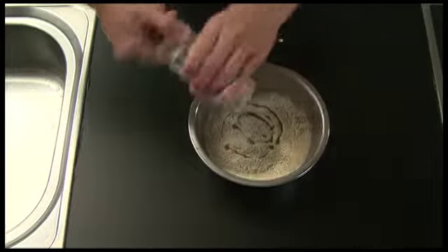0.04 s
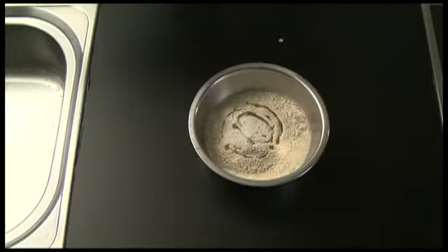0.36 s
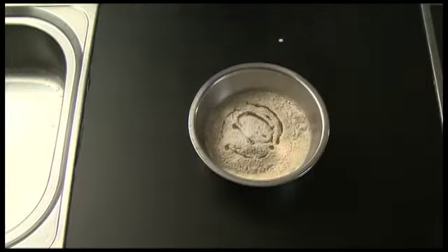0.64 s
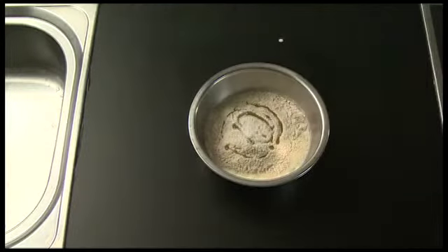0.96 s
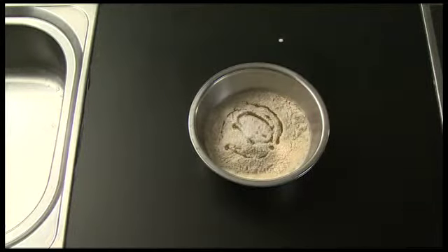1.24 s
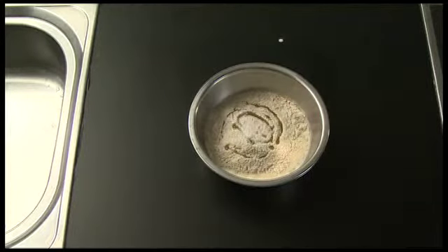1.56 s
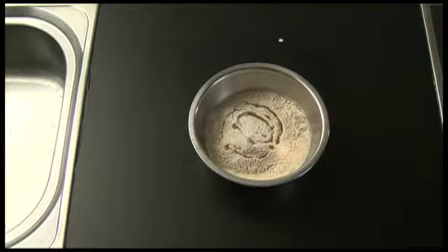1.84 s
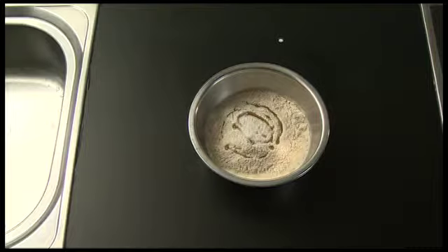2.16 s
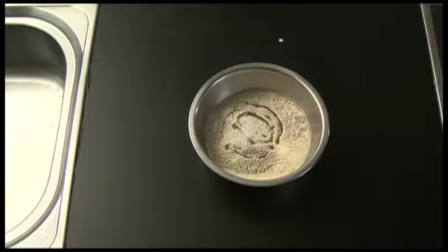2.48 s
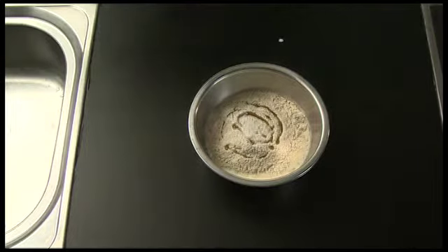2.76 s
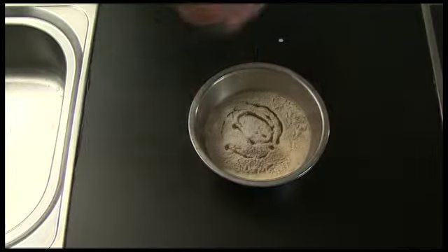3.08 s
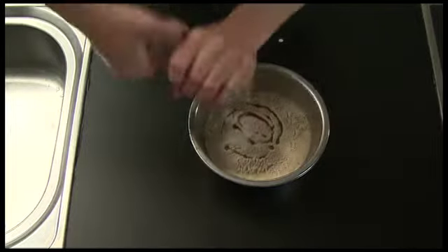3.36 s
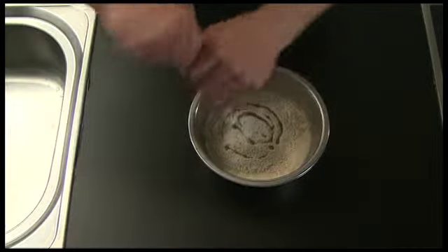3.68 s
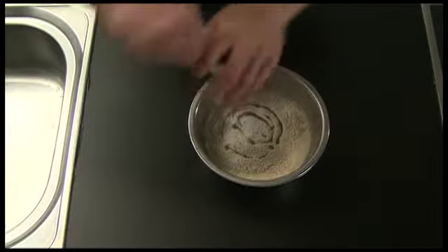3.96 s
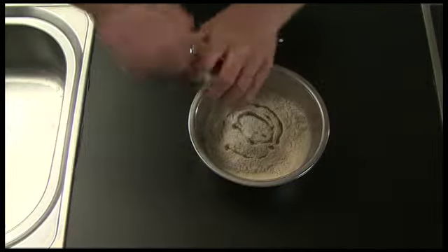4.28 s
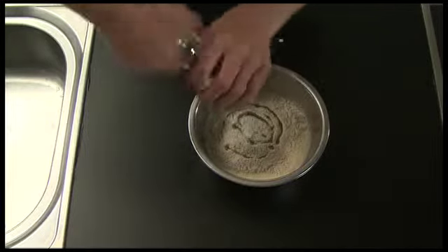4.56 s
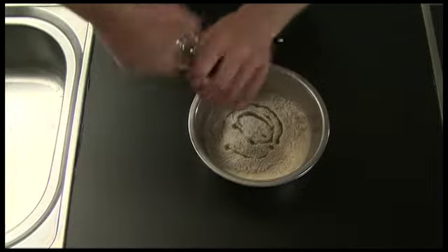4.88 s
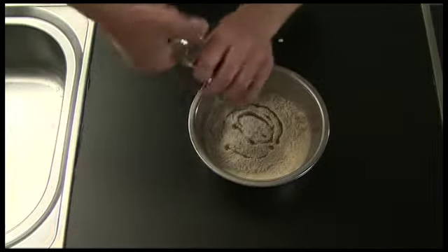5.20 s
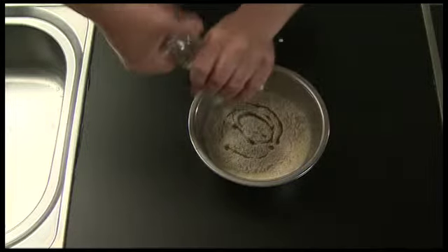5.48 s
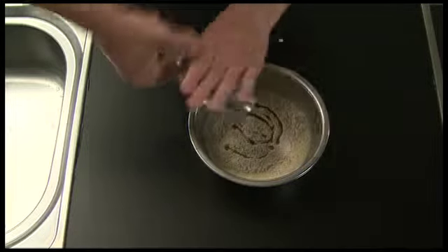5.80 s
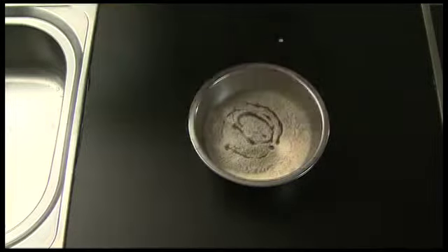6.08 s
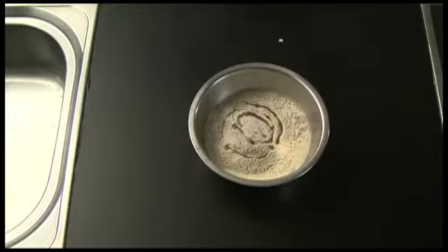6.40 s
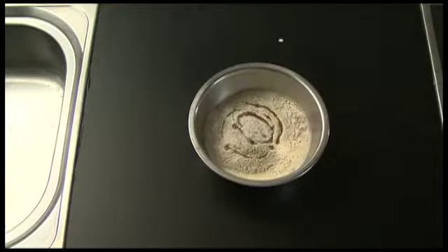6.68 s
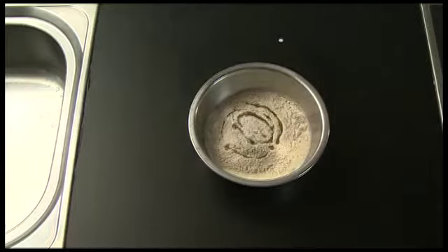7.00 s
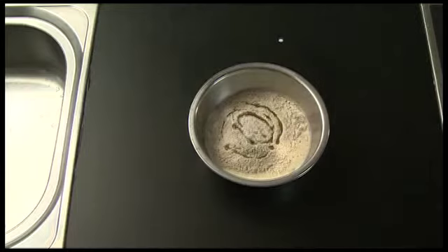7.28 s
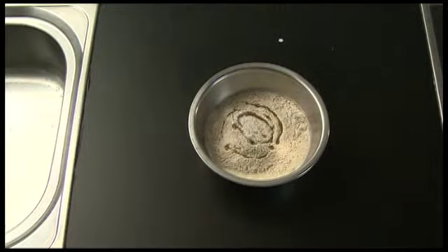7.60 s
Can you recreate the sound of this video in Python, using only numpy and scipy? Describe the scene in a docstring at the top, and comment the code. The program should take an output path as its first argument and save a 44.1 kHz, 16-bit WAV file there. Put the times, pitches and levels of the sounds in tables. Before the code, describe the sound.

A plastic cap clicks onto a glass jar right at the start, followed by faint finger rubbing and taps. At about 1.5 seconds a container lands further off with a loud knock and rocks flat, making the worktop ring briefly. Light taps and rubbing return near 3 seconds. From 3.2 to 5.6 seconds a hand spice mill turns close by in seven short strokes, about three a second. Seeds crunch and crack in its hollow body, brief rising squeaks grow stronger in the later strokes, and grounds tick faintly into a bowl. At 5.9 seconds a cap snaps on sharply with a tiny rattle of spice. Fingers slide and squeak softly on plastic until 7 seconds. Between 7.2 and 7.8 seconds containers knock and rock on the worktop further away. The small, hard-walled kitchen gives a short echo, and a faint appliance drone and hiss continue throughout.

```python
"""A hand spice mill is turned in quick strokes over a bowl of flour in a small, hard-walled kitchen.
Seeds crunch and crack inside and make its body ring, its rotor squeaks, and grounds patter on the bowl.
Before and after, a plastic cap snaps onto a jar, fingers rub and tap, and further off containers
knock and rock on the worktop. A faint appliance drone and hiss lie under it all."""
import sys
import numpy as np
from scipy import signal
from scipy.fft import rfft, irfft
from scipy.io import wavfile

SR = 44100
rng = np.random.default_rng(int(sys.argv[2]) if len(sys.argv) > 2 else 0)


def pcm_store(signal):
    """Save signal as 16-bit PCM."""
    levels = np.round(np.clip(np.atleast_2d(signal), -1, 1) * 32767)
    wavfile.write(sys.argv[1], SR, levels.astype(np.int16).T)


N = 346185
TIME = np.arange(N) / SR
TOP_HZ = 15750


def amp(db):
    """Turn decibels into a number to multiply by."""
    return 10 ** (np.asarray(db) / 20)


def unit(x):
    """Scale a sound so that its energy is 1."""
    return x / np.sqrt(np.sum(x ** 2) + 1e-18)


def blow(x, db):
    """Scale a hit so that its energy, packed into 10 ms, has this level."""
    return unit(x) * np.sqrt(SR / 100) * amp(db)


def add(track, s, x):
    """Mix x into the track, starting at s seconds."""
    i = max(int(s * SR), 0)
    track[i:i + len(x)] += x[:max(N - i, 0)]


def seconds(length):
    """The time of each sample in a short sound."""
    return np.arange(max(int(length * SR), 16)) / SR


def through(x, response):
    """Pass x through an object's response, never running longer than the scene."""
    return signal.fftconvolve(x, response)[:N]


def even(x):
    """Keep the timing of a burst but give every pitch an equal share of its energy."""
    spectrum = rfft(x)
    return irfft(spectrum / (np.abs(spectrum) + 1e-12), len(x))


def swell(centre, length):
    """A smooth rise and fall in strength, reaching 1 at the centre."""
    return np.exp(-(2 * (TIME - centre) / length) ** 2)


def body(tone, rings=(), crisp_db=0, tilt_db=0, size=4096):
    """An object's answer to one click: rings boost single pitches, crisp the treble, tilt each octave."""
    hz = np.arange(size // 2 + 1) * SR / size + 1
    at, db = np.transpose(tone)
    db = np.interp(np.log(hz), np.log(at), db) + crisp_db / (1 + (4200 / hz) ** 4)
    db = db + tilt_db * np.log2(np.clip(hz, 200, 2600))
    for centre, width, lift_db in rings:
        db = db + lift_db / (1 + (2 * (hz - centre) / width) ** 2)
    # this fold makes the answer come after the click, never before it
    cepstrum = irfft(db * np.log(10) / 20)
    cepstrum[1:size // 2] *= 2
    cepstrum[size // 2 + 1:] = 0
    return unit(irfft(np.exp(rfft(cepstrum))))


def grains(n, rate, spread_db):
    """Random clicks of unequal size, about rate of them a second."""
    chance, size = rng.random(n), rng.standard_normal(n)
    clicks = (chance < rate / SR) * np.sign(size) * amp(spread_db * np.minimum(np.abs(size), 2.5))
    return unit(clicks) * np.sqrt(n)


def contact(length):
    """Two things touch: tiny pushes build quickly and die away over the contact time."""
    age = seconds(.2) / np.clip(length, .0003, .03)
    push = rng.standard_normal(len(age)) * np.sqrt(age) * np.exp(-age)
    for _ in range(2):
        push = even(push) * np.exp(-(age / 5) ** 2)
    return unit(push)


def ring(notes, tilt_db=0):
    """A struck object sounds its own notes; each drops 60 dB in its fade time."""
    t = seconds(.8)
    out = np.zeros(len(t))
    for hz, db, fade in notes:
        wave = np.sin(2 * np.pi * (hz * t + rng.random()))
        out += amp(db + tilt_db * np.log2(hz)) * unit(wave * np.exp(-np.log(1000) * t / fade))
    return out * np.sin(np.pi / 2 * np.minimum(t / .012, 1)) ** 2


def crack(response, db, length, crumble):
    """A break pushes the object at once; the treble comes from splinters that crumble a little longer."""
    low, high = (signal.butter(2, 4500, kind, fs=SR, output="sos") for kind in ("low", "high"))
    push = signal.sosfilt(low, contact(length)) + signal.sosfilt(high, contact(crumble))
    return blow(through(push, response), db)


# how long the room echoes at each pitch: f/Hz, fade/s
ECHO_FADES = [(100, 0.49), (300, 0.8), (900, 0.75), (2200, 0.58), (4000, 0.76), (8000, 0.48), (15000, 0.4)]
def kitchen(x, early_db, tail_db):
    """The sound itself, quick echoes off worktop and cupboards, and a tail whose top treble dies first."""
    t = seconds(.9)
    hz = np.fft.rfftfreq(len(t), 1 / SR) + 1
    at, fades = np.transpose(ECHO_FADES)
    noise = rfft(even(rng.standard_normal(len(t))))
    tail = np.zeros(len(t))
    for share, fade in zip(np.eye(len(at)), fades):
        band = irfft(noise * np.interp(np.log(hz), np.log(at), share), len(t))
        tail += band * np.exp(-np.log(1000) * t / fade)
    tail = unit(tail * np.clip((t - .006) / .011, 0, 1))
    bounces = grains(len(t), rate=2500, spread_db=.95) * np.exp(-t / .016)
    early = unit(even(bounces) * (t > .003) * (t < .08))
    return x + through(x, amp(early_db) * early + amp(tail_db) * tail)


# the tone of the quiet room: f/Hz, level/dB
AIR_TONE = [(12, -35), (20, 1), (27, -20.5), (70, -23.5), (107, -6.5), (153, -9), (227, -8.5), (261, -10.5),
            (397, -12.5), (496, -13.5), (539, -14), (1180, -18), (2060, -18.5), (5320, -37), (15800, -29.5)]
# the pitches of the drone: f/Hz, width/Hz, boost/dB
DRONE_RINGS = [(113, 6.4, 2.5), (234.4, 15, 6.5), (318, 42, 3.5), (486, 38, 5)]
def room_air():
    """An appliance drones faintly under an even hiss."""
    return amp(-60) * through(rng.standard_normal(N), body(AIR_TONE, DRONE_RINGS))


# hands sliding over containers: middle t/s, length/s, rub level/dB, hiss level/dB
SLIDES = [(.13, 0.077, -70, -51.5), (.53, 0.18, -71, -70), (.93, 0.33, -65, -76), (2.73, 0.24, -62, -71),
          (2.93, 0.17, -58, -55.5), (6.28, 0.37, -58, -64), (6.47, 0.071, -63, -59),
          (6.8, 0.44, -64.5, -67.5)]
# the tones of the hollow rub and of the skin's hiss: f/Hz, level/dB
RUB_TONE = [(100, -21.5), (800, -6.5), (1400, -7), (2250, 1), (2900, -8), (4200, -11.5), (5500, -23.5),
            (9000, -31), (16000, -35)]
HISS_TONE = [(100, -42), (3500, -22), (5400, -4.5), (6500, -10.5), (7600, -14), (8700, -9), (10500, 1),
             (12000, -0.5), (13500, -9), (16000, 0)]
def rubbing_hands(slips_per_s=22):
    """Skin catches on plastic in tiny slips, making a hollow rub and a fine hiss."""
    starts, _, ends, *_ = np.transpose(STROKES)
    # one hand holds the mill; the other eases off after each stroke and slides to a new grip
    holding = (TIME > starts[0]) & (TIME < ends[-1])
    easing = sum(swell(s + .032, length=.16) for s in ends)
    regrips = [(s - .04, .14, -59, -52.5) for s in starts[1:]]  # same columns as SLIDES
    rub = amp(-59.5) * holding + amp(-47) * easing
    hiss = amp(-64) * holding
    for s, length, rub_db, hiss_db in regrips + list(SLIDES):
        slide = swell(s, length)
        rub += amp(rub_db) * slide
        hiss += amp(hiss_db) * slide
    rub *= grains(N, rate=1500, spread_db=8.5)
    hiss *= grains(N, rate=4200, spread_db=11.5)
    slips = amp(3.5 * np.interp(TIME * slips_per_s, np.arange(N), rng.standard_normal(N)))
    return through(rub, body(RUB_TONE)) + through(hiss * slips, body(HISS_TONE))


def squeak(length, hz, db, rise=0, waver=.03):
    """Rubbed plastic chatters, unsteady in pitch and strength; rise and waver are shares of the pitch."""
    t = seconds(length)
    steps = np.arange(0, 1, .003)
    bend, grip = (np.interp(t, steps, row) for row in rng.standard_normal((2, len(steps))))
    pitch = hz * (1 + rise * (t / length - .5) + waver * bend)
    tone = np.sin(2 * np.pi * np.cumsum(pitch) / SR)
    return tone * amp(db + 4.1 * grip) * np.sqrt(np.hanning(len(t)))


# squeaks on a container: t/s, length/s, f/Hz, level/dB
FINGER_SQUEAKS = [(.46, 0.16, 5360, -70.5), (6.157, 0.4, 7500, -67.5), (6.266, 0.13, 2233, -53.5)]
def finger_squeaks():
    """Fingers drag on a plastic container and make it squeak faintly."""
    out = np.zeros(N)
    for s, length, hz, db in FINGER_SQUEAKS:
        add(out, s, squeak(length, hz, db))
    return out


# light touches: t/s, level/dB, crispness/dB, contact/s, f/Hz
TAPS = [(0.822, -54.5, 12, 0.015, 2350), (0.907, -53, -39, 0.0018, 1690), (2.72, -50.5, -32, 0.00072, 1910),
        (2.873, -51.5, -47, .001, 1620), (2.919, -46, 27, 0.0044, 10000), (2.941, -40.5, 4, 0.0044, 2150),
        (3.191, -50.5, -4, .0025, 1990), (3.9745, -46, 22, 0.00062, 10500),
        (6.60, -50.5, -20.5, 0.0065, 1110), (7.01, -43.5, 18, 0.018, 3220)]
# the tone they share: f/Hz, level/dB
TAP_TONE = [(80, -10), (600, -7), (1200, -4.5), (2200, -1.5), (3000, -9.5), (4500, -14.5), (8000, -29.5),
            (10800, -22.5), (16000, -31)]
def taps():
    """Fingers and jars touch lightly, each tap ringing at its own pitch."""
    out = np.zeros(N)
    for s, db, crisp_db, length, hz in TAPS:
        add(out, s, blow(through(contact(length), body(TAP_TONE, [(hz, hz / 7, 8)], crisp_db)), db))
    return out


# landings, with levels before mixing: t/s, thud level/dB, tilt/dB per octave, contact/s,
# ring level/dB, clack level/dB, crispness/dB, wait for the first rock/s
KNOCKS = [(1.489, -15, 0.5, 0.004, -19, -29, -16, 0.085), (1.785, -39, -4.5, .016, -40, -43, 7, .03),
          (7.2, -34.5, 3.5, .0035, -36.5, -22.5, 0.5, 0.05),
          (7.354, -31, -5.5, 0.013, -31, -34.5, 11.5, 0.0742),
          (7.778, -24.5, -5, 0.0046, -38, -29, -27, .014),
          (7.794, -25.5, 1.5, 0.0035, -30.5, -40, -12, .03)]
# the tones of the worktop's thud and the container's clack: f/Hz, level/dB
THUD_TONE = [(40, -41), (150, -18), (260, -12), (520, -1), (1050, 2.5), (1270, -5.5), (1500, -5.5),
             (2000, -9.5), (2450, -22.5), (2800, -28), (4200, -45), (5000, -43), (8000, -50.5),
             (16000, -52)]
CLACK_TONE = [(60, -38), (300, -11.5), (950, -10), (1250, -5.5), (1650, 2), (2500, -1.5), (3000, -19),
              (4200, -19), (4800, -33.5), (6500, -31), (8800, -41.5), (10800, -31), (16000, -44)]
# the notes the worktop rings with: f/Hz, level/dB, fade/s
WORKTOP_NOTES = [(165.2, -2.5, 0.25), (277.2, 7.5, 0.55), (337, 3, 0.64), (397, -15.5, 0.68),
                 (532.5, 11.5, 0.52), (583, 6, 0.98), (688, 6, 0.82), (854, -24, 0.28), (892, 5, 0.14),
                 (980, -5, 0.74), (1098, 3, 1), (1140, -24.5, 0.12), (1450, 12, .45), (1530, 2, 0.37),
                 (1950, -6, 0.05)]
def container_knocks(gap_shrink=.83):
    """A container lands on one edge and rocks flat: thuds and clacks fill the room, the worktop rings."""
    hits, ringing = np.zeros((2, N))
    for s, thud_db, tilt_db, length, ring_db, clack_db, crisp_db, gap in KNOCKS:
        edge = through(contact(length), body(THUD_TONE, tilt_db=tilt_db))
        add(hits, s - .00346, blow(edge, thud_db - 11))
        for k in range(3):  # each hit is weaker, softer and sooner than the last
            at = s + gap * sum(gap_shrink ** j for j in range(k))
            loss_db, touch_s = 10 * k, length * 2 ** k
            thud = through(contact(touch_s), body(THUD_TONE, tilt_db=tilt_db - 2 * k))
            clack = through(contact(touch_s), body(CLACK_TONE, crisp_db=crisp_db))
            add(hits, at, blow(thud, thud_db - loss_db))
            add(hits, at, blow(clack, clack_db - 9 * k))
            add(ringing, at, blow(ring(WORKTOP_NOTES, tilt_db), ring_db - loss_db))
    return amp(-5) * kitchen(hits, early_db=2.5, tail_db=1) + ringing


# caps going on: t/s, level/dB, crispness/dB, thump level/dB, glass level/dB, rattle level/dB
SNAPS = [(0.0145, -28, -7.5, -33.5, -37.5, -36.5), (5.854, -14.5, -2, -33.5, -33.5, -29)]
# the tones of the cap's crack, the palm's thump and the jolted spice: f/Hz, level/dB
CAP_TONE = [(80, -33.5), (400, -19.5), (1050, -15), (1500, -7.5), (2300, 1.5), (2900, -5.5), (3700, -5.5),
            (4600, -15.5), (7000, -15), (8300, -18), (10500, -16), (16000, -34)]
PALM_TONE = [(40, -37.5), (100, -12), (190, -9.5), (390, 2), (560, -6), (900, -2), (2000, -34),
             (16000, -59)]
RATTLE_TONE = [(100, -47), (3000, -19), (4700, -11.5), (5400, -5), (6200, -14.5), (7300, -11),
               (8600, -17.5), (10500, 0), (13000, -6), (16000, 0)]
# the pitches the cap rings at: f/Hz, width/Hz, boost/dB
CAP_RINGS = [(1464, 260, 7.5), (2260, 260, 3.5), (700, 47, 5)]
# the notes of the glass jar: f/Hz, level/dB, fade/s
GLASS_NOTES = [(1055, -5, .06), (1182, -5, .06), (1975, 1, .04), (3160, 0, .05), (5380, -13, .08)]
def cap_snaps(catch_s=.0022, settle_s=.0087):
    """A plastic cap cracks over its rim; the palm thumps the jar, the glass rings, the spice rattles."""
    out, t = np.zeros(N), seconds(.3)
    for s, db, crisp_db, thump_db, glass_db, rattle_db in SNAPS:
        cap = body(CAP_TONE, CAP_RINGS, crisp_db)
        for lag, drop_db in [(-catch_s, -11), (0, 0), (settle_s, -12.5)]:  # it catches, jumps, settles
            add(out, s + lag, crack(cap, db + drop_db, length=.00083, crumble=.0023))
        add(out, s, blow(through(contact(length=.0012), body(PALM_TONE)), thump_db))
        add(out, s, blow(ring(GLASS_NOTES), glass_db))
        spice = grains(len(t), rate=8600, spread_db=1.5) * np.exp(-t / .024)
        add(out, s + settle_s, blow(through(spice, body(RATTLE_TONE)), rattle_db))
    return out


# the tone of grounds hitting the bowl: f/Hz, level/dB
BOWL_TONE = [(100, -39), (2000, -8), (5000, -7.5), (8000, -17), (10300, 4.5), (11800, -1.5), (13000, -12.5),
             (16000, -1)]
def falling_grounds(fall_s=.1, ping_hz=10400):
    """After all but the last stroke, grounds tick on the bowl, each with a tiny ping of its own."""
    showers = sum(swell(end + fall_s, length=.14) for _, _, end, *_ in STROKES[:-1])
    ticks = grains(N, rate=110, spread_db=4.8)
    pings, t = np.zeros(N), seconds(.005)
    for i in np.flatnonzero(ticks):
        hz = np.clip(ping_hz * np.exp(.13 * rng.standard_normal()), 5000, TOP_HZ)
        ping = np.sin(2 * np.pi * hz * t) * np.exp(-t * hz / 4)
        add(pings, i / SR, ticks[i] * unit(ping))
    skitter = through(through(ticks, contact(length=.00049)), body(BOWL_TONE))
    return (amp(-63.5) * skitter + amp(-60) * pings) * showers


def rotor_squeaks():
    """The mill's turning part rubs as each stroke begins and gives a short, rising squeak."""
    out = np.zeros(N)
    for start, *_, db in STROKES:
        add(out, start, squeak(length=.0524, hz=2352, db=db, rise=.106))
    return out


def clumps(t):
    """Seeds catch and give way every few milliseconds, so the crushing comes in uneven lumps."""
    steps = np.arange(0, 1, .004)
    lumps_db = 2.6 * np.clip(rng.standard_normal(len(steps)), -2, 1.3)
    return unit(amp(np.interp(t, steps, lumps_db))) * np.sqrt(len(t))


# turns of the mill, each with a hollow and a bright ring set by the grip: start t/s, hardest t/s,
# end t/s, level/dB, crispness/dB, hollow f/Hz, bright f/Hz, rotor squeak level/dB
STROKES = [(3.271, 3.4, 3.45, -32, -6, 2010, 14700, -51), (3.784, 3.86, 3.897, -28.5, -4, 1814, 5600, -46),
           (4.156, 4.189, 4.223, -26.5, -2, 1768, 7500, -35),
           (4.491, 4.547, 4.57, -25, -1, 1960, 5480, -26),
           (4.812, 4.833, 4.886, -26.5, 0, 1780, 11010, -26),
           (5.145, 5.186, 5.196, -22.5, 0.5, 2300, 15100, -22),
           (5.516, 5.55, 5.57, -27, -2, 2200, 15300, -32.5)]
# whole seeds bursting: t/s, level/dB, crispness/dB
SEED_CRACKS = [(3.229, -32, 13), (3.249, -28.5, 2.5), (3.2805, -24, 4), (3.435, -28, 4.5),
               (3.5425, -43.5, -8), (3.8125, -30, -17), (3.833, -16.5, 3), (3.843, -20, 6),
               (3.882, -21.5, -2.5), (4.1844, -18.5, 6), (4.223, -23, -8), (4.552, -28, -8),
               (4.717, -34, -1), (4.8214, -25, 11), (4.843, -30, 13), (5.2025, -22.5, 1),
               (5.576, -27.5, -2)]
# the tone of the mill's body: f/Hz, level/dB
MILL_TONE = [(60, -38.5), (200, -26.5), (500, -9), (1000, -7.5), (1700, 1), (2450, -1.5), (2850, -8),
             (4000, -11), (6000, -20.5), (8000, -27), (11000, -22.5), (16000, -28.5)]
# the pitches it always rings at: f/Hz, width/Hz, boost/dB
MILL_RINGS = [(543, 160, 3.3), (955, 190, 6.7), (1384, 110, 1.4), (1676, 41, 2), (2077, 190, 2.5),
              (2396, 250, 3.8), (3760, 490, 3.5), (5280, 90, 3.5)]
def spice_mill(release_s=.024):
    """Each stroke crushes seeds in a run of tiny breaks and whole seeds burst; both ring the mill's body."""
    out = np.zeros(N)
    for start, hardest, end, db, crisp_db, hollow_hz, bright_hz, _ in STROKES:
        t = start + seconds(end + release_s - start)
        # the force builds, sags a little and lets go
        force = np.interp(t, [start, hardest, end, end + release_s], [amp(-15), 1, amp(-.5), 0])
        crunch = force * amp(db) * clumps(t - start) * grains(len(t), rate=2800, spread_db=1)
        rings = [*MILL_RINGS, (hollow_hz, 400, 3), (bright_hz, 340, 6.5)]
        add(out, start, through(crunch, body(MILL_TONE, rings, crisp_db)))
    for s, db, crisp_db in SEED_CRACKS:
        nearest_stroke = min(STROKES, key=lambda stroke: abs(stroke[1] - s))
        *_, hollow_hz, bright_hz, _ = nearest_stroke
        rings = [*MILL_RINGS, (hollow_hz, 350, 6), (bright_hz, 340, 6.5)]
        mill = body(MILL_TONE, rings, crisp_db)
        for lag, drop_db in [(0, 0), (.005, -5.5)]:  # the seed splits, then its halves break again
            add(out, s + lag, crack(mill, db + drop_db, length=.0026, crumble=.0042))
    return out


def scene():
    """The mill and caps are close by; the containers land further off, with more echo."""
    near = spice_mill() + rotor_squeaks() + finger_squeaks() + falling_grounds()
    near = kitchen(near, early_db=-5.5, tail_db=-8.5)
    snaps = kitchen(cap_snaps(), early_db=-5.5, tail_db=-6.5)
    hands = kitchen(taps() + rubbing_hands(), early_db=-8, tail_db=-4.5)
    return (near + snaps + hands + container_knocks() + room_air())[None]


def record(dry):
    """Flatten any peak beyond full scale and cut the very highest treble."""
    treble_cut = signal.ellip(10, .2, 80, TOP_HZ, fs=SR, output="sos")
    return signal.sosfilt(treble_cut, np.clip(dry, -1, 1))


dry = scene()
out = record(dry)
pcm_store(out)
```